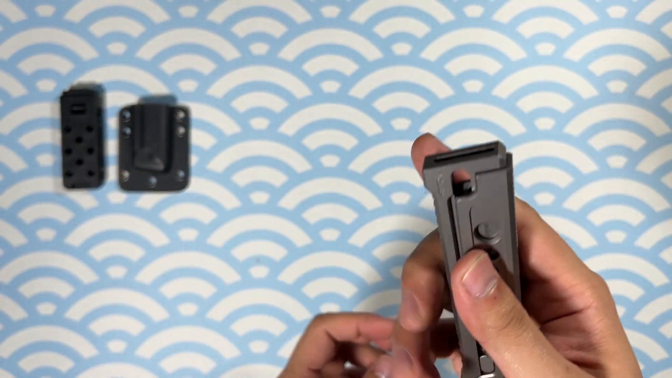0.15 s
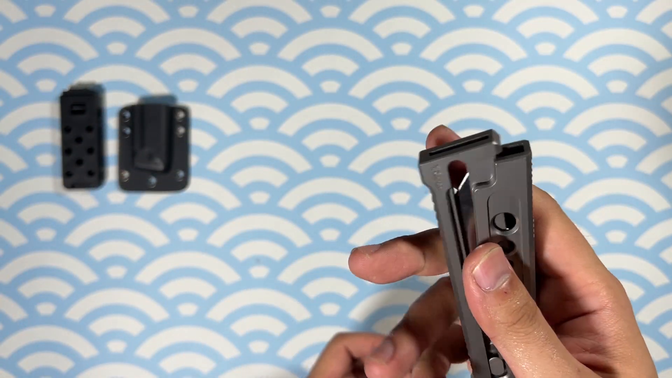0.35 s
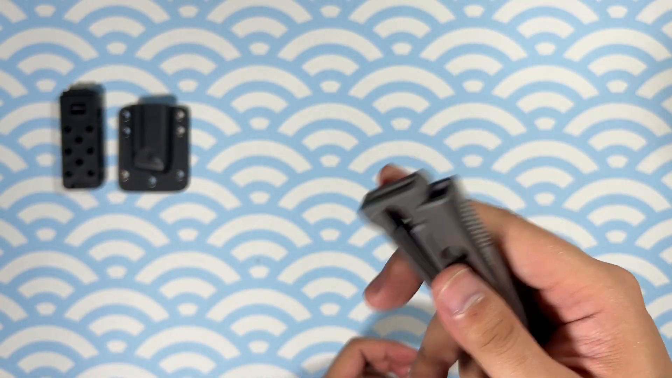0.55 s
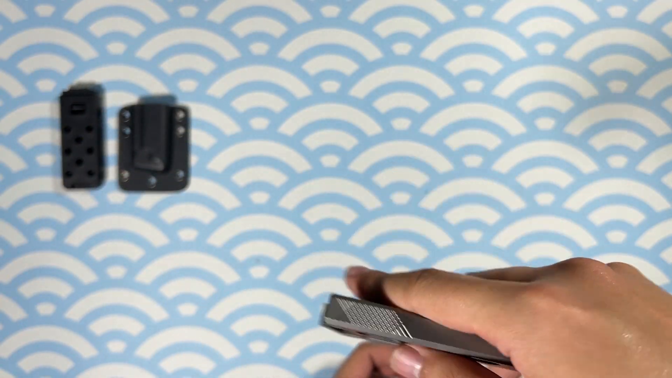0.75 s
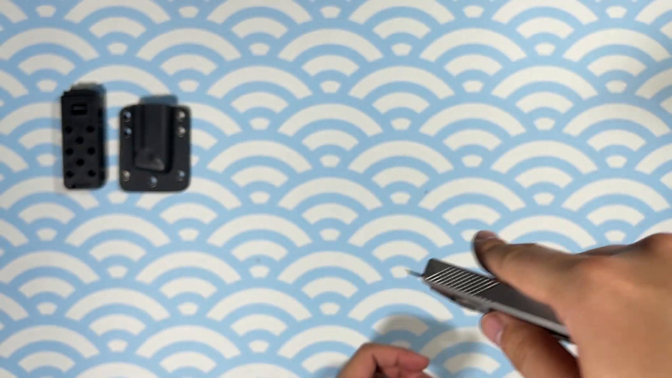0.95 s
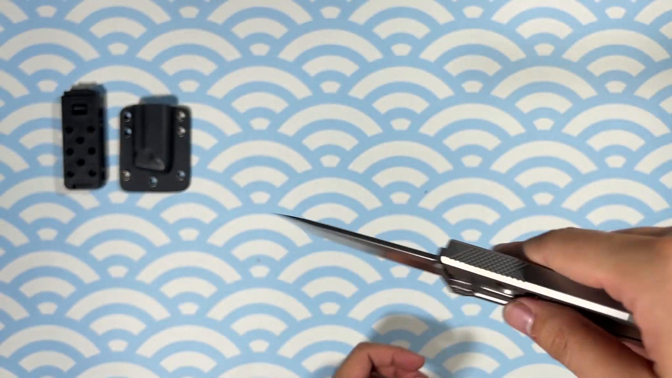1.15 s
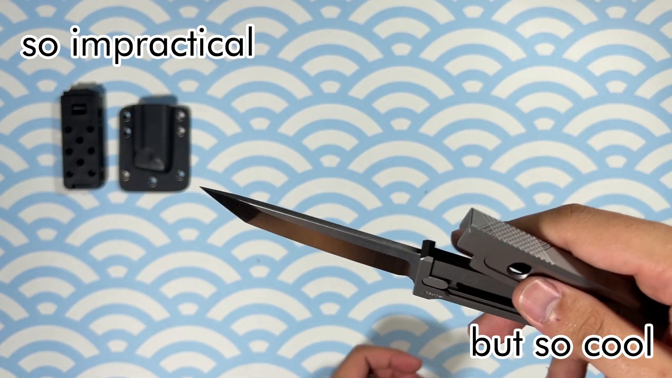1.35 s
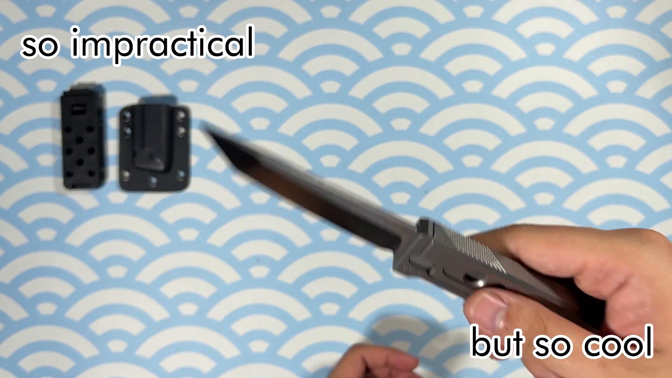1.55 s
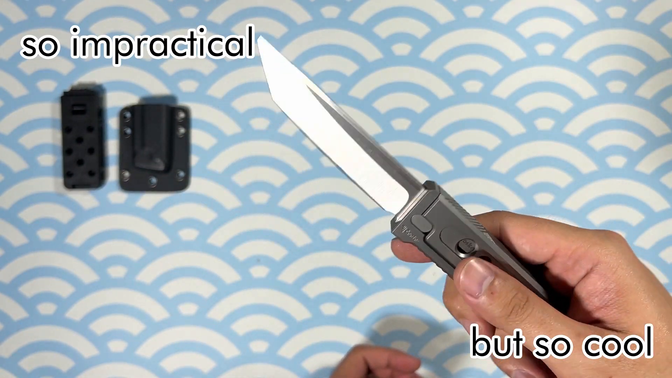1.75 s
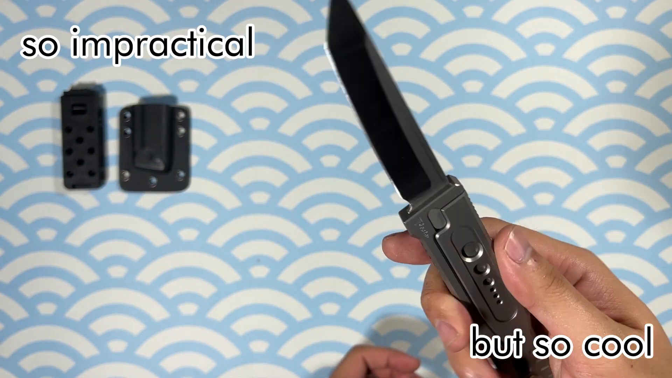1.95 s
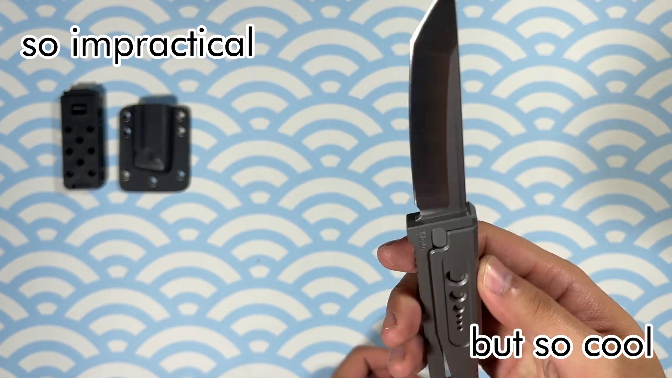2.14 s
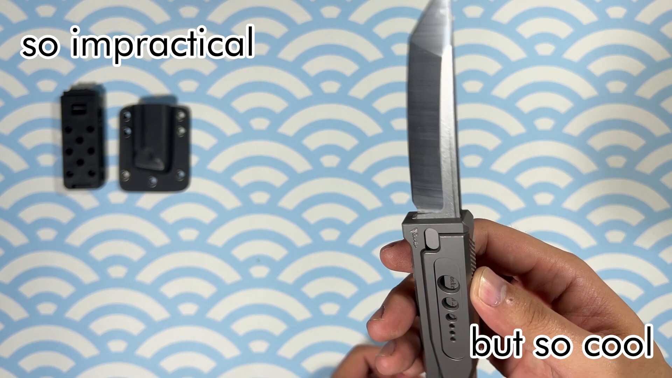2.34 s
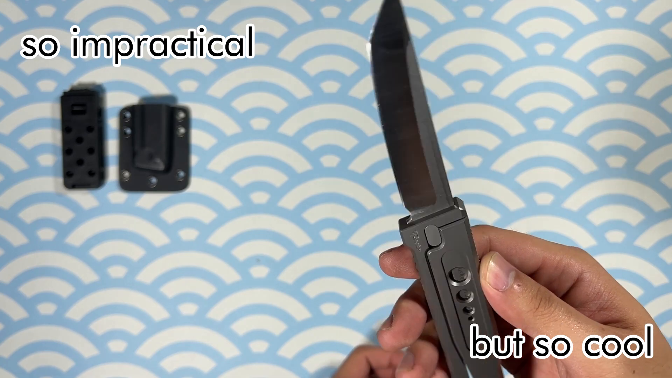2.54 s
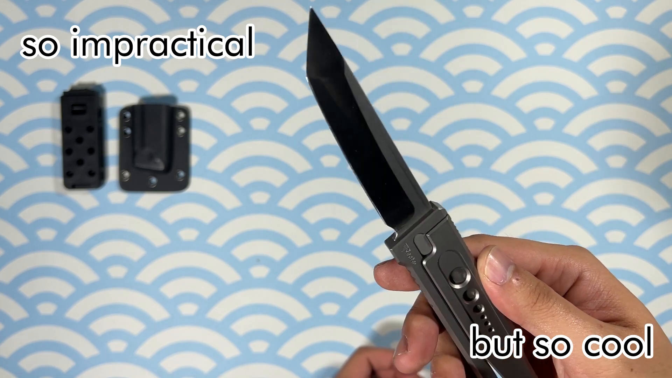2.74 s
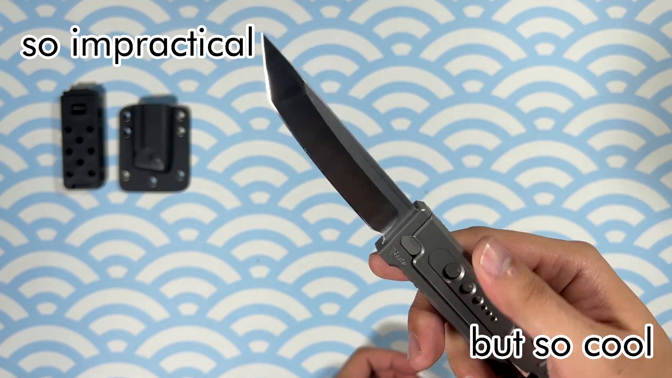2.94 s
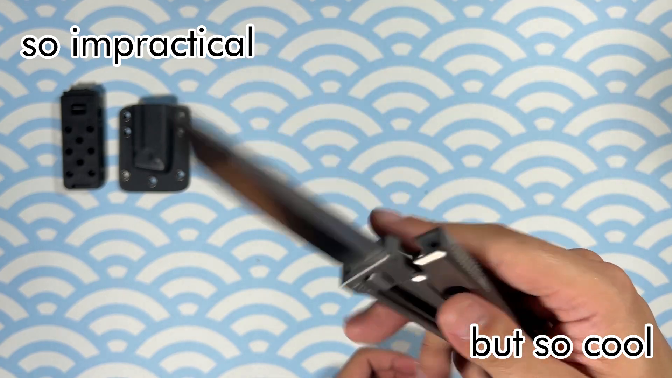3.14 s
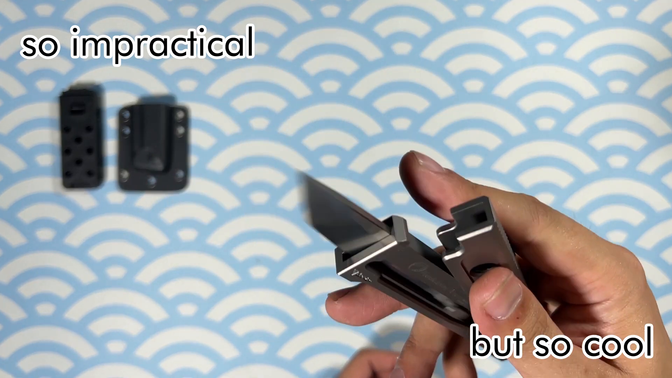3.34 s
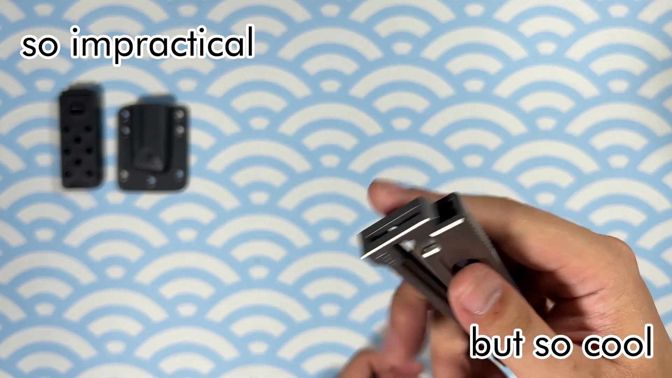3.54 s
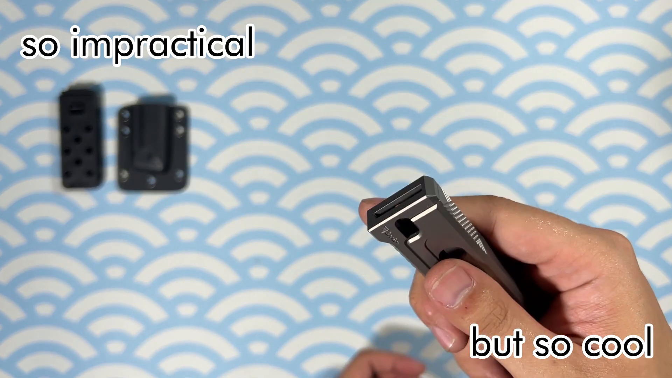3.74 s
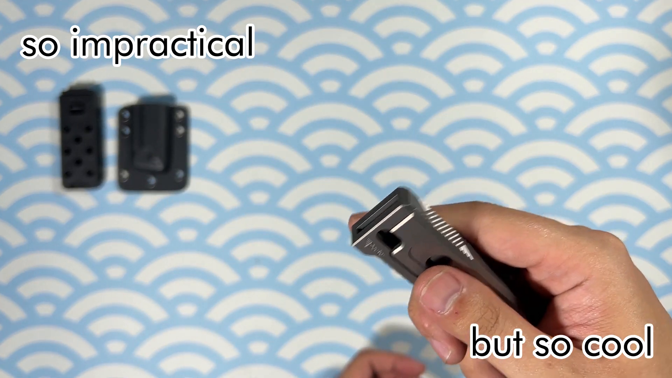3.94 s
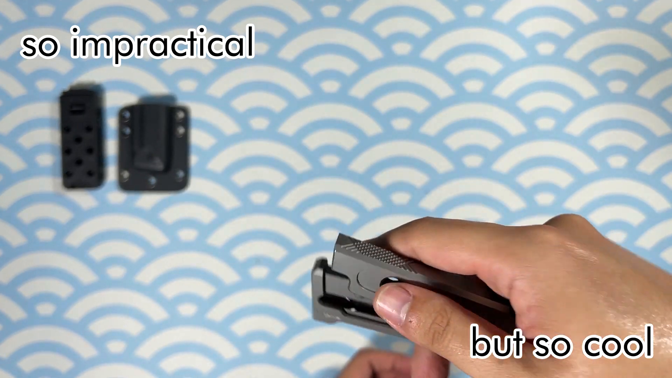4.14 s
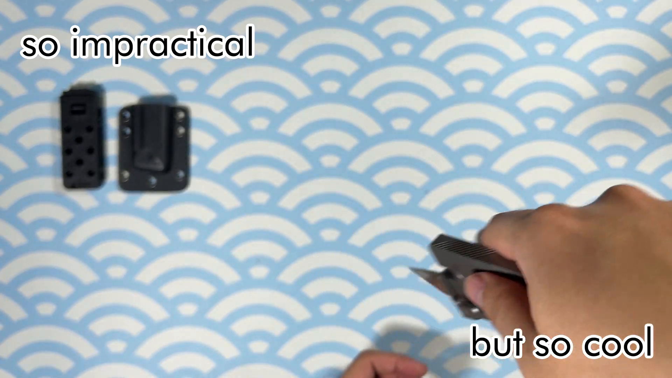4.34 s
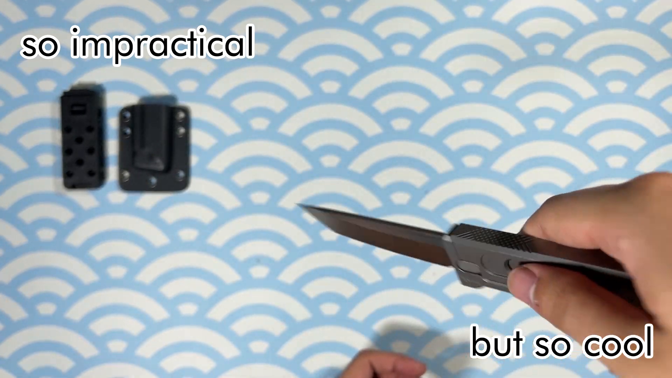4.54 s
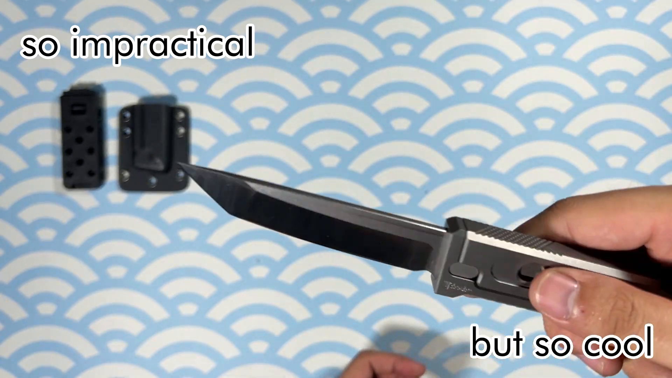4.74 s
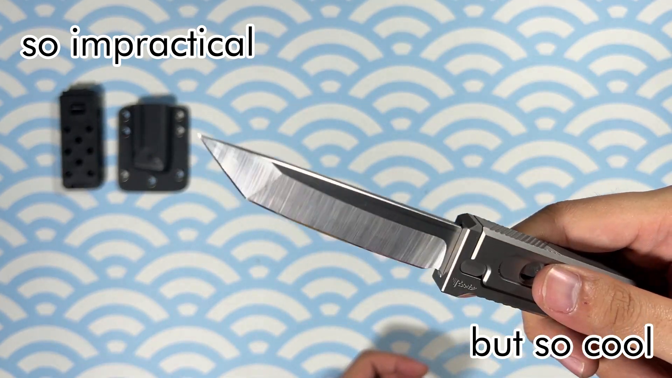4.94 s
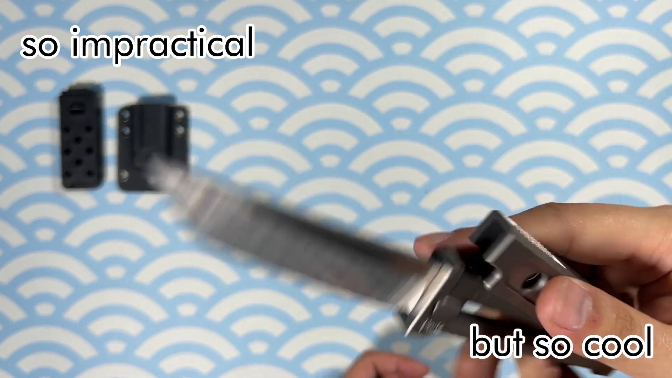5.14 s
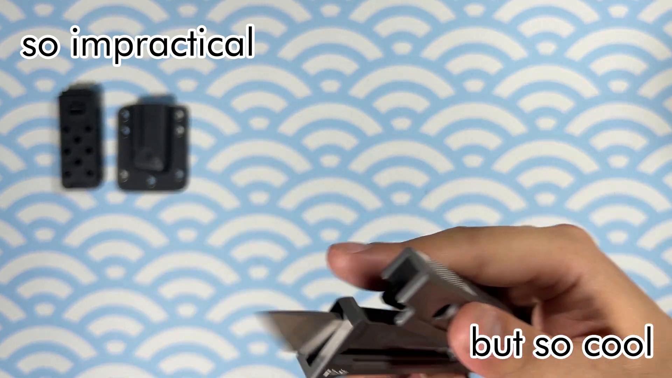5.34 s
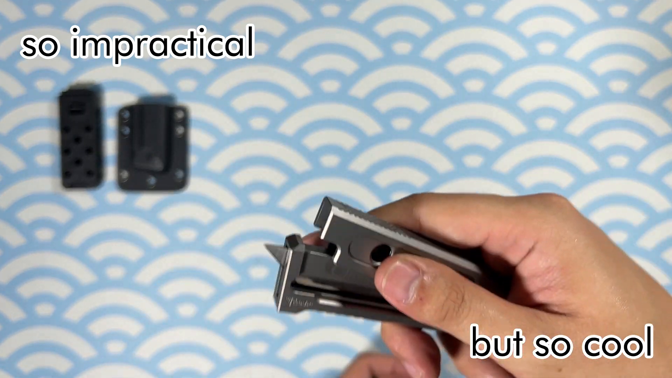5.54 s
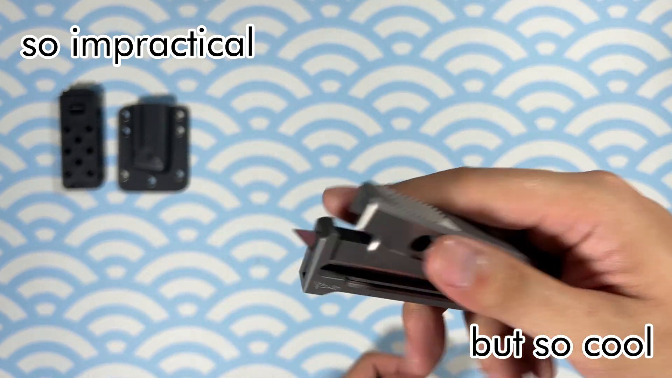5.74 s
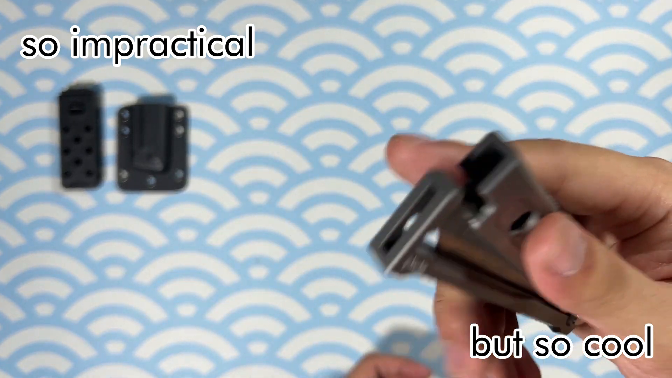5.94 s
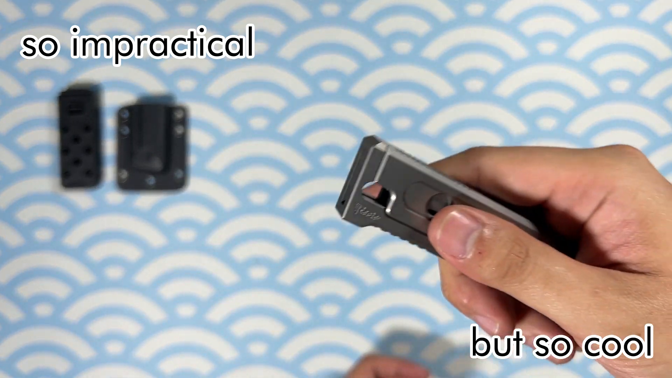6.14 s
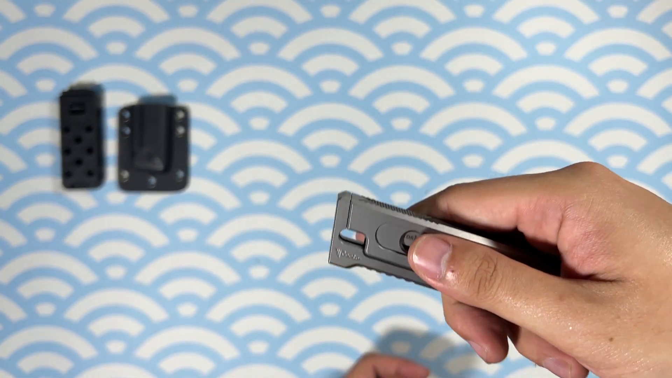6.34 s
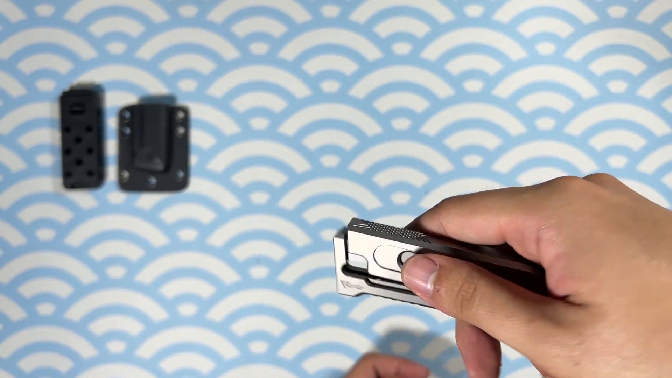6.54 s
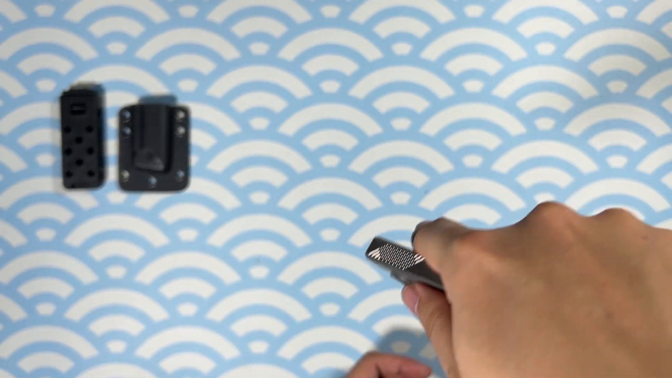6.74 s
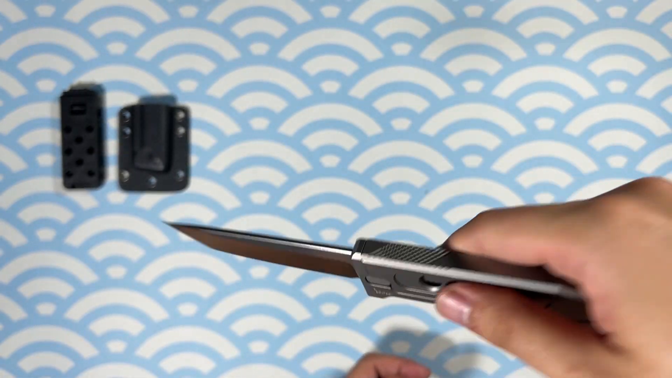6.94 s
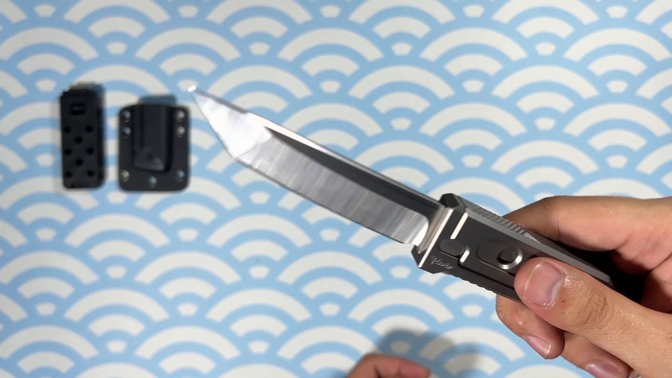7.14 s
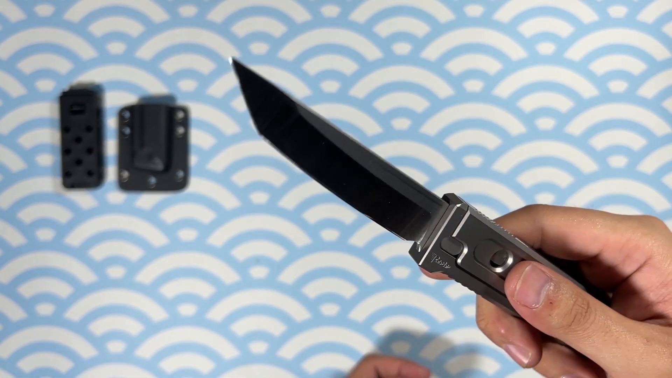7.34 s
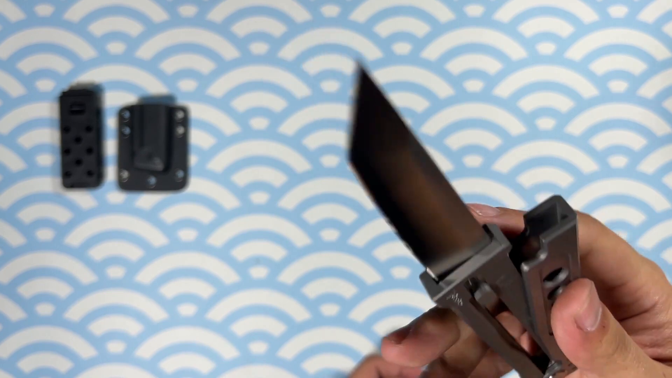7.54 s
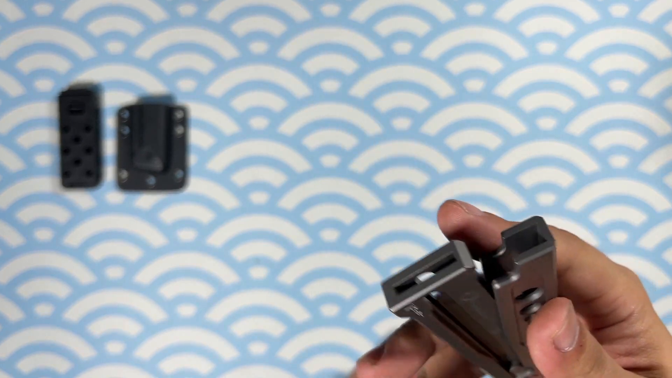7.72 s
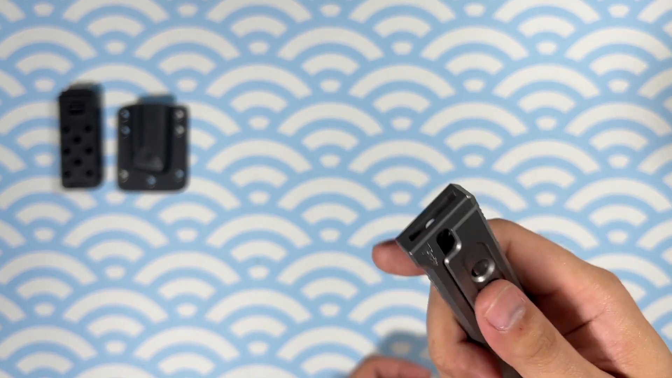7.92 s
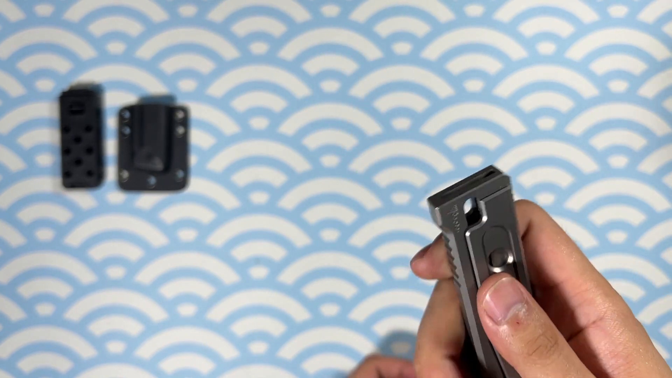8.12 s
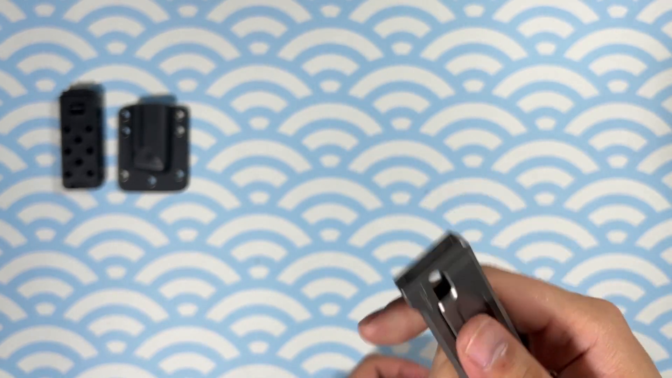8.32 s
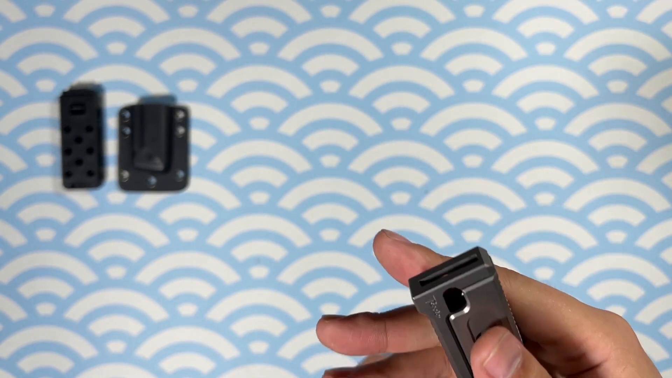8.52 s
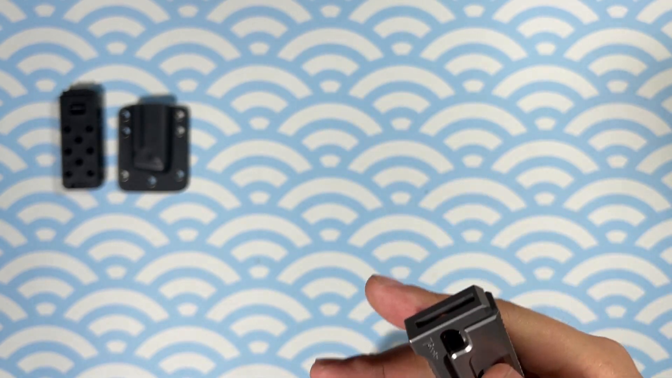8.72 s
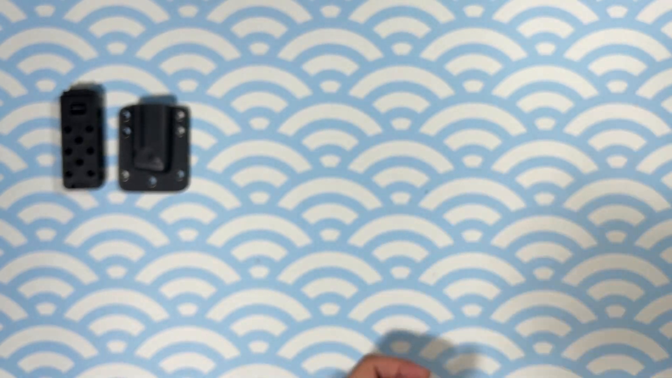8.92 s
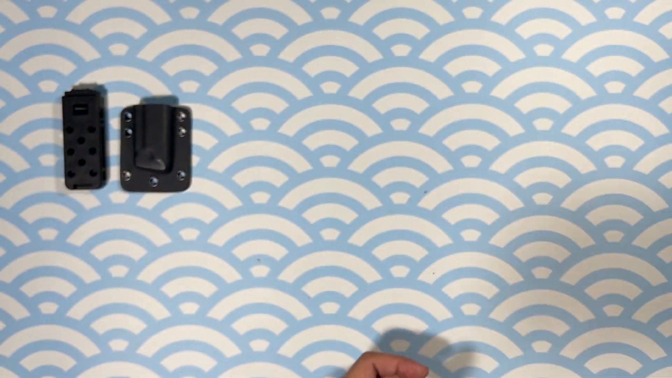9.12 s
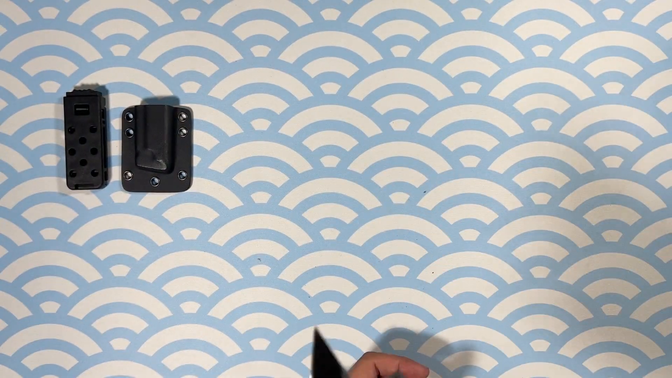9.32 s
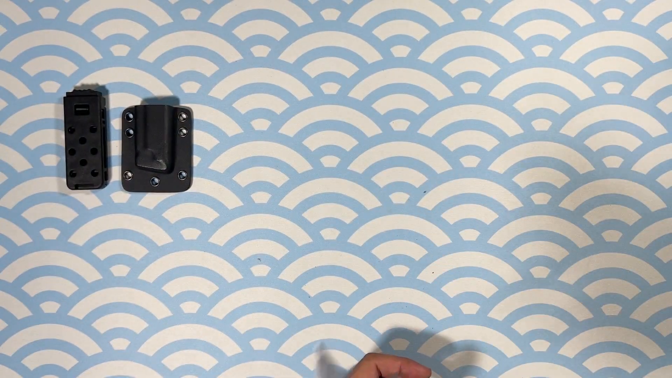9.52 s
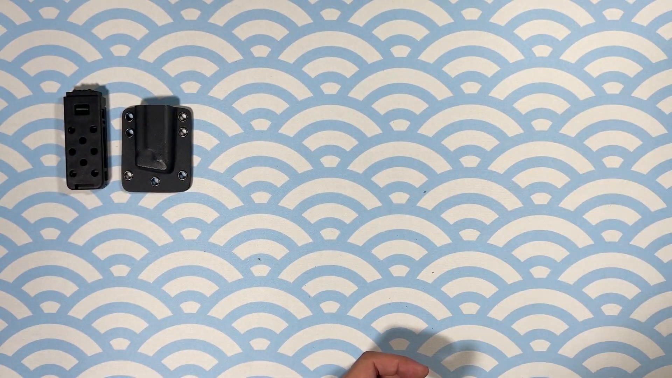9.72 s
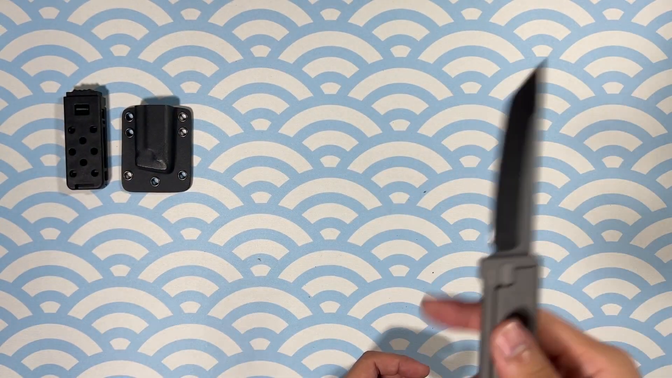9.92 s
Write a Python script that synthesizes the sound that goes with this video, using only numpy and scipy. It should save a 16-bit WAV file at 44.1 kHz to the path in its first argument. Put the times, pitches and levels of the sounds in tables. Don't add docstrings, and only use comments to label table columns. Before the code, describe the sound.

Bright metal clacks and thin ticks burst as a folding knife slides open, drops closed and snaps shut over low hum and soft clock ticking.

```python
import sys
import numpy as np
from scipy import signal
from scipy.fft import rfft, irfft, next_fast_len
from scipy.io import wavfile

SR = 44100
rng = np.random.default_rng(int(sys.argv[2]) if len(sys.argv) > 2 else 0)


def inscribe(sig):
    pcm = np.round(np.clip(np.atleast_2d(sig).T, -1, 1) * 32767)
    wavfile.write(sys.argv[1], SR, pcm.astype(np.int16))


N = 439677
PAD = next_fast_len(N + SR)
HZ = np.maximum(np.arange(PAD // 2 + 1) * SR / PAD, 1)

# f/Hz, width/Hz, level/dB
HUM = [
    (56.4, 2.3, -53),
    (162, 3, -79),
    (113.5, 6.8, -72.5),
    (1770, 71, -98.5),
]
# f/Hz, level/dB per Hz
AIR = [(41, -27.5), (70, -5), (87, -26.5), (171, -25.5), (306, -38), (374, -36.5), (639, -45), (720, -47),
       (1200, -53.5), (1560, -80), (2640, -120)]
AIR_DB = -65.5
# f/Hz, likeness/0-1
AIR_LIKENESS = [(60, 0.55), (240, 0.65), (950, 0.058), (3770, 0.061), (15000, 0.084)]
# f/Hz, level/dB per Hz
HISS = [(710, -33), (1200, -3), (1700, -4), (2700, -18), (5810, -17), (6990, -11), (9000, -24),
        (11700, -54), (19800, -120)]
HISS_DB = -86

# f/Hz, level/dB per Hz
CLOCK_CASE = [(290, -63.5), (500, -28), (853, -11), (957, -14.5), (1540, -15), (1730, -7), (2060, -21),
              (5210, -28), (8000, -44), (10400, -75), (17600, -120)]
CLOCK_START_S, CLOCK_PERIOD_S, CLOCK_DB = -.003, 1.0001, -64

# t/s, peak/dB, low body/dB, top/dB, f/Hz
HITS = [(1.1672, -21.5, -11.5, -19.5, 4960), (1.3656, -10, -17, -1, 7360), (1.7238, -26, -6, -6, 4000),
        (1.7266, -17, -6.5, -4.5, 4300), (3.608, -7, -19, -4, 3200), (3.6208, -17.5, -11, -20.5, 5650),
        (3.7634, -4, -19.5, -5, 4990), (4.6321, -7.5, -23.5, -4.5, 6320), (5.5699, -15.5, -12, 1, 4600),
        (6.0711, -14, -10.5, -1, 3266), (6.1743, -5.5, -24, -5, 7420), (7.0282, -8, -21, -2, 7200),
        (7.031, -14.5, -25, -6, 4500), (4.647, -20.5, -24.5, -6, 5400), (3.7594, -25.5, -18, -3.5, 7500),
        (7.1141, -21.5, 2, -6, 2500), (7.8799, -8.5, -15.5, 0, 6870), (7.8934, -18, -17, -13, 7300),
        (8.0254, -7.5, -28.5, 4, 6680), (9.019, -16, -45.5, -3.5, 6760), (9.3836, -9, -11.5, -2, 4300),
        (9.3884, -11, -15, -8.5, 7470), (9.5841, -30.5, -12, -6, 6950)]
# t/s, peak/dB, top/dB, f/Hz
TICKS = [(0.1626, -57.5, -61, 3870), (0.2787, -35.5, -12, 4300), (0.335, -51, -24, 3940),
         (0.39, -33, -2, 7000), (1.4366, -35.5, -10.5, 7270), (3.3103, -31.5, -6, 5100),
         (3.3707, -34, -7, 3760), (3.4134, -39.5, 9, 8400), (3.4378, -36.5, 6, 6930),
         (4.406, -44.5, -17.5, 3690), (4.4764, -51, -18, 7260), (4.574, -40.5, -26, 7520),
         (4.8606, -52.5, -21, 3730), (5.371, -28.5, 2, 7600), (5.3901, -27, -43, 7000),
         (5.4254, -40, 4, 8650), (5.477, -33, 7, 6960), (6.0297, -34.5, -20.5, 7470),
         (7.7075, -34, -0.5, 8300), (7.7112, -32, 13, 8330), (3.3502, -37, -4.5, 7290),
         (5.3107, -42.5, -5, 7390), (5.99, -43, 2.5, 8020), (1.455, -38.5, -6, 4910),
         (1.476, -38, -8, 4380), (7.7427, -35, 3, 8760), (7.7815, -34, -3.5, 3250), (8.541, -52, -11, 3810),
         (8.6206, -30.5, -8, 4100), (9.2363, -45.5, 5.5, 8250), (9.2556, -36.5, -2, 3690),
         (9.434, -27.5, 1, 5400), (9.553, -34, -4, 4210), (9.7623, -50.5, -19.5, 3760),
         (9.7893, -52, -15, 3700), (9.839, -51.5, -8, 3810)]
TICK_LOW_DB = -19.5
# t/s, peak/dB, low body/dB, f/Hz
KNOCKS = [(0.5732, -41, -7, 3800), (0.7575, -29, -9, 7500), (0.831, -45, -1, 1990),
          (1.6733, -57, 0.5, 3800), (1.6898, -58, 10, 3940), (3.135, -74, 9.5, 2410),
          (3.2816, -51.5, 1.5, 4500), (4.2317, -65.5, 3, 2700), (5.258, -44.5, -4, 4026),
          (5.2798, -60, 12, 2570), (5.2914, -41.5, 1.5, 4820), (7.5803, -50.5, -6, 2580),
          (7.625, -35.5, -5.5, 4430), (8.996, -46, -8, 7340), (9.3632, -40, -10, 3640),
          (9.378, -31.5, 0, 5000), (9.593, -33, -15, 4500), (9.188, -54.5, -10, 3600),
          (9.215, -45, -9, 4000), (4.397, -59.5, 7, 3590), (9.6843, -46.5, -8.5, 3520)]
KNOCK_TOP_DB = -9
# t/s, peak/dB, low body/dB, f/Hz
MUFFLED = [(1.235, -28, -7, 4930), (1.802, -31, -11, 4700), (3.163, -73, 18.5, 2760),
           (4.75, -38.5, 4, 2770), (5.925, -41.5, -5, 3880), (6.1476, -32, -4.5, 3690),
           (6.4944, -78.5, 13, 2530), (6.758, -46, -12, 3446), (8.393, -78.5, 16, 3350),
           (8.4382, -82, 17.5, 3610)]
MUFFLED_TOP_DB = -10.5

# f/Hz, time to fall 60 dB/s
SINGING_MODES = [(3850, .06), (4620, .12), (5160, .12), (6510, .08), (7420, .16), (9480, .11), (3170, .07),
                 (4365, .1), (5405, .12), (11245, .1), (13120, .1)]
FRAME_VOICE_DB = [-12, -4.5, -4.5, -7, -10, -19, -15.5, -14.5, -10.5, -14, -13]
BLADE_VOICE_DB = [-10.5, -7, -8, -14.5, 0.5, -8, -16, -7.5, -3.5, -17.5, -9]
# t/s, frame/dB, blade/dB
SINGING = [(1.368, -53.5, -49.5), (1.724, -55, -65), (3.607, -40.5, -36.5), (3.764, -39, -51.5),
           (4.634, -62, -25.5), (4.75, -60, -51), (5.568, -40, -46), (6.176, -35, -30.5),
           (7.029, -49, -25.5), (7.113, -49.5, -46), (7.882, -62.5, -27.5), (8.024, -33.5, -34),
           (8.623, -62, -74.5), (9.018, -50, -44), (9.381, -59, -63), (9.581, -51.5, -55.5),
           (6.072, -48, -52.5)]
# t/s, f/Hz, level/dB, 60 dB fall/s
RINGS = [(0.39, 2980, -49, 0.027), (1.727, 2520, -32, 0.047), (1.728, 3776, -39.5, 0.072),
         (1.802, 4700, -55, 0.041), (7.03, 4350, -29, .1), (3.609, 5710, -20, 0.19),
         (3.609, 7410, -21, 0.21), (3.609, 3110, -32.5, 0.11), (3.763, 4596, -34.5, 0.14),
         (3.764, 5158, -34.5, 0.096), (3.765, 2465, -38.5, .09), (6.071, 5765, -38, .15),
         (6.072, 3230, -42.5, 0.056), (6.174, 2409, -36, 0.16), (6.175, 2515, -38, 0.13),
         (7.029, 5740, -31, .15), (7.029, 9700, -33, .12), (7.115, 2544, -38, 0.089),
         (7.114, 2460, -33, 0.13), (8.025, 2469, -42, 0.16), (8.621, 3900, -62, .11),
         (8.621, 4060, -61, .1), (9.02, 2540, -35.5, 0.062), (9.582, 7450, -55, .18)]
STRIKE_SPREAD_DB = 2
PAIR_SPLIT, HOLD_DETUNE = .004, .003

# f/Hz, width/Hz, level/dB
RAIL = [(3300, 27, -4.5), (4620, 860, 0), (7370, 790, -1), (9170, 120, 2.5), (12500, 300, -2.5),
        (15420, 320, 4)]
# t/s, level/dB
SLIDES_OUT = [
    [(.98, -85), (1.08, -71), (1.16, -51.5), (1.2, -46.5), (1.29, -47), (1.36, -50.5)],
    [(4.41, -70.5), (4.47, -59), (4.53, -52.5), (4.6, -48), (4.63, -32)],
    [(6.745, -87), (6.77, -64.5), (6.85, -64), (6.92, -54), (7.0, -51), (7.025, -36)],
]
OUT_TOP_DB = -18
FAST_DB, GAP_HZ, GAP_HZ_PER_DB, GAP_TOP_HZ, GAP_DB, GAP_DB_PER_DB = -50, 4270, 44.5, 4500, -10, 0.74
# t/s, scrape/dB, bite of the edge as top/dB
SLIDES_IN = [
    [(3.32, -50.5, -8), (3.35, -46.5, -3), (3.385, -46.5, -9), (3.405, -62, -13), (3.45, -43.5, -4),
     (3.52, -48, 0.5), (3.585, -47, 0), (3.605, -40.5, -8)],
    [(5.27, -100, -28), (5.3, -53, -15), (5.36, -44.5, -5), (5.41, -52, -13), (5.46, -43, -1),
     (5.51, -49.5, -1), (5.565, -44, -3)],
    [(5.93, -60, -15), (5.98, -49.5, -12.5), (6.02, -68.5, -10.5), (6.065, -52, 4.5)],
    [(7.62, -71, -14), (7.64, -51, -12), (7.7, -57.5, -5), (7.76, -41, -5), (7.84, -60.5, 4),
     (7.876, -39.5, -17)],
]
IN_GAP_HZ, IN_GAP_DB, IN_GAP_PER_BITE = 4000, -14, 0.75
# start t/s, peak t/s, end t/s, peak/dB, gap f/Hz
RUBS = [
    (0.497, 0.551, 0.55, -57.5, 3660),
    (1.658, 1.721, 1.72, -49.5, 3250),
    (4.247, 4.286, 4.35, -57, 3386),
    (9.19, 9.247, 9.32, -52, 3503),
    (8.483, 8.515, 8.57, -78.5, 3794),
    (9.845, 9.879, 10.02, -61, 3458),
]
RUB_IN_DB, RUB_OUT_DB, RUB_SHOULDER, RUB_TOP_DB, RUB_GAP_DB = 26.5, 35, 0.38, -20, -1
# t/s, level/dB, length/s
RATTLES = [
    (3.627, -35, 0.13),
    (4.645, -27.5, .155),
    (6.096, -52, 0.064),
    (7.043, -26.5, .07),
    (7.901, -30, .1),
]
RATTLE_HOLD_S, RATTLE_DB_PER_S = 0.018, 251
RATTLE_TOP_DB, RATTLE_HZ, RATTLE_GAP_DB = -12.5, 4700, -5.5
# t/s, level/dB
RUSHES = [(3.76, -50), (6.17, -33), (8.02, -36), (7.879, -35.5), (7.027, -30), (9.381, -43)]
RUSH_S, RUSH_DB = .022, 18
# t/s, hold/s, level/dB
SETTLES = [
    (1.4, .08, -48.5),
    (9.398, 0.039, -46),
]
SETTLE_S, SETTLE_DB, SETTLE_TOP_DB, SETTLE_HZ, SETTLE_GAP_DB = 0.079, 54.5, -16, 4930, -16
RATTLE_LOW_DB, SLIDE_LOW_DB, LOW_SPLIT_HZ = -8.5, -3, 3300

# from t/s, to t/s, from f/Hz, to f/Hz, level/dB
CATCHES = [(1.1, 1.166, 7800, 7900, -64.5), (1.255, 1.3, 5000, 5000, -53.5),
           (1.203, 1.349, 8100, 7700, -64), (1.683, 1.7, 2350, 2760, -57), (1.67, 1.718, 1650, 1750, -64.5),
           (6.882, 7.026, 7500, 8050, -56), (9.241, 9.283, 3900, 3430, -56.5),
           (9.858, 9.89, 3300, 3300, -63), (9.9, 9.927, 3400, 3250, -59), (3.335, 3.36, 4400, 4600, -53.5),
           (3.372, 3.41, 3900, 3700, -54.5), (3.455, 3.49, 12540, 12400, -52),
           (3.525, 3.585, 12300, 12600, -50.5), (3.51, 3.56, 7930, 7800, -54),
           (5.425, 5.496, 12400, 12400, -54), (5.418, 5.49, 11200, 11500, -55),
           (5.33, 5.42, 4000, 3900, -60), (5.365, 5.39, 7540, 7500, -50), (5.424, 5.478, 8330, 9400, -44),
           (5.51, 5.55, 7400, 7900, -49), (5.955, 5.992, 4000, 3800, -58.5), (6.757, 6.8, 3300, 3400, -62),
           (6.83, 6.865, 3820, 3900, -55), (6.89, 6.935, 3900, 4600, -55), (6.965, 7.0, 4400, 4300, -58),
           (7.635, 7.66, 7640, 7400, -69.5), (7.635, 7.66, 4500, 4400, -55),
           (7.745, 7.835, 12600, 12500, -51.5), (7.783, 7.8, 9200, 9100, -45.5)]
CATCH_WIDTH_HZ = 130
# t/s, level/dB
THUMPS = [(3.61, -46.5), (4.638, -28.5), (9.5, -47), (7.035, -38.5), (7.884, -75), (9.388, -42),
          (9.022, -51), (8.8, -51.5)]
# from t/s, to t/s, f/Hz, width/Hz, level/dB
CREAKS = [(3.7, 4.005, 570, 30, -74), (6.7, 6.8, 985, 70, -71), (6.72, 6.9, 560, 200, -73),
          (7.689, 7.788, 604, 60, -74.5), (6.78, 6.91, 950, 200, -75), (4.262, 4.33, 1600, 300, -74),
          (3.61, 3.7, 1000, 200, -70), (8.03, 8.15, 1550, 150, -70)]

# f/Hz, time/s
ROOM_T60 = [(500, 0.11), (2000, 0.28), (5000, 0.28), (10000, 0.26), (16000, 0.1)]
# f/Hz, likeness/0-1
ROOM_LIKENESS = [(500, .1), (1500, .4), (3000, .1), (6000, 0), (8000, .9), (16000, .95)]
# f/Hz, left minus right/dB
ROOM_LEAN = [(2000, 0), (2800, 1), (4000, 4), (5500, 8), (7000, 4), (9000, 0)]
# f/Hz, level/dB
DIRECT_DIP = [(3000, 1), (4300, -0.5), (5500, -9), (6600, -2), (8000, 2)]
# f/Hz, phase/radians
PORT_PHASE = [(0, 0), (2150, 0), (3010, 1.1), (5080, 1.1), (6460, -.3), (7920, -.9), (9730, -2.55),
              (10800, -3.45), (12800, -6.0), (14500, -6.7), (16700, -9.7)]
# f/Hz, left minus right/dB
PORT_BALANCE = [(60, 2.0), (150, 0.0), (380, 0.0), (950, -2), (2380, -0.5), (5980, 1.0), (15000, 0.0)]
# f/Hz, level/dB
PORT_COLOUR = [(300, 6.5), (1000, -3), (2000, -1), (2700, 2.5), (5000, 5.5), (7500, 0), (9500, 0.5),
               (11000, 11.5), (13000, -1.5), (15700, -1), (16300, -9)]


def from_db(db):
    return 10 ** (np.asarray(db) / 20)


def rms_one(x):
    return x / np.sqrt(np.mean(x ** 2) + 1e-20)


def at_hz(points, hz):
    curve_hz, value = np.transpose(points)
    return np.interp(np.log(hz), np.log(curve_hz + 1), value)


def band(x, low_hz, high_hz, order=2):
    sos = signal.butter(order, [low_hz, min(high_hz, 20000)], "band", fs=SR, output="sos")
    return signal.sosfilt(sos, x + 1e-18)


def resonance(x, hz, width_hz):
    r = np.exp(-np.pi * width_hz / SR)
    feedback = [1, -2 * r * np.cos(2 * np.pi * hz / SR), r * r]
    return signal.lfilter(np.array([1, 0, -1]) * (1 - r * r) / 2, feedback, x)


def coloured(spectrum):
    white = rfft(rng.standard_normal(PAD))
    return rms_one(irfft(white * from_db(at_hz(spectrum, HZ)), PAD)[:N])


def background():
    hum = sum(from_db(db) * rms_one(resonance(rng.standard_normal(N + SR), hz, width)[SR:])
              for hz, width, db in HUM[2:])
    (hz, width, db), (third_hz, _, third_db) = HUM[:2]
    wander = rms_one(band(rng.standard_normal(N + SR), 0.42, 12, order=1)[SR:])
    sway = rms_one(band(rng.standard_normal(N + SR), 4.2, 8.2, order=1)[SR:])
    turns = 2 * np.pi * np.cumsum(hz + .5 * width * wander) / SR
    hum += np.sqrt(2) * from_db(db + 1.3 * sway) * np.sin(turns)
    hum += np.sqrt(2) * from_db(third_db + 5.9 * wander) * np.sin(turns * third_hz / hz)
    hiss = from_db(HISS_DB + 3) * np.array([coloured(HISS), coloured(HISS)])
    alike = np.clip(at_hz(AIR_LIKENESS, HZ), 0, 1)
    low_cut = HZ ** 2 / (HZ ** 2 + 45 ** 2)
    mid, side = rfft(rng.standard_normal((2, PAD))) * from_db(at_hz(AIR, HZ)) * low_cut
    air = irfft(np.sqrt(1 + alike) * mid + np.sqrt(1 - alike) * side * [[1], [-1]], PAD)[:, :N]
    hum_at_ports = band(hum, 42, 5800) * from_db([[.8], [-.8]])
    return hum_at_ports + from_db(AIR_DB) * rms_one(air) + hiss


def clock():
    t, shape = np.arange(N) / SR, np.zeros(N)
    for s in CLOCK_START_S + CLOCK_PERIOD_S * np.arange(10):
        age = np.clip(t - s, 0, 1)
        shape += from_db(CLOCK_DB) * (1 - np.exp(-age / 0.0034)) * np.exp(-(age / 0.091) ** 2.0)
    return shape * np.array([coloured(CLOCK_CASE), coloured(CLOCK_CASE)])


def contacts():
    ticks = [(s, db, TICK_LOW_DB, top_db, hz) for s, db, top_db, hz in TICKS]
    knocks = [(s, db, low_db, KNOCK_TOP_DB, hz) for s, db, low_db, hz in KNOCKS]
    muffled = [(s, db, low_db, MUFFLED_TOP_DB, hz) for s, db, low_db, hz in MUFFLED]
    return sorted(HITS + ticks + knocks + muffled)


def clacks():
    crack = np.zeros(N)
    t = np.arange(1600) / SR
    fall = np.exp(-(t / 0.0037) ** 1.8)
    fall += from_db(3.5) * np.exp(-t / 0.0007) + from_db(-23.5) * np.exp(-t / 0.0055)
    envelope = (1 - np.exp(-t / 0.00036)) * fall
    for s, db, low_db, top_db, hz in contacts():
        grit = rng.standard_normal(1600) * from_db(2.7 * rng.standard_normal(1600))
        chatter = grit * envelope
        body = band(chatter, 2700, 9500, order=3) + from_db(6.5) * resonance(chatter, hz, 0.095 * hz)
        knock = band(chatter, 1300, 3500) + from_db(16.0) * resonance(chatter, 2540, 300)
        tick = band(chatter, 7000, 15000)
        start = round(s * SR) - 20
        for part, part_db in [(body, 0), (knock, low_db), (tick, top_db)]:
            crack[start:start + 1600] += part / np.abs(part).max() * from_db(db + part_db)
    return crack


def pair(hz, t60, split):
    t = np.arange(SR // 4) / SR
    partials = .7 * np.sin(2 * np.pi * hz * t) + .3 * np.sin(2 * np.pi * hz * (1 + split) * t)
    return partials * from_db(-60 * t / t60)


def loose(tone, flutter_db):
    flutter = rms_one(band(rng.standard_normal(N // 20 + 1), 230, 3800, order=1))
    return tone * from_db(flutter_db * np.repeat(flutter, 20)[:N])


def singing():
    s, frame_db, blade_db = np.transpose(SINGING)
    starts = np.round(s * SR).astype(int) + 40
    out, alone = np.zeros(N), np.zeros(N)
    for (hz, t60), of_frame_db, of_blade_db in zip(SINGING_MODES, FRAME_VOICE_DB, BLADE_VOICE_DB):
        mode = np.zeros(N)
        luck = rng.standard_normal((len(s), 3))
        blow = from_db(frame_db + of_frame_db) + from_db(blade_db + of_blade_db)
        blow = blow * from_db(STRIKE_SPREAD_DB * luck[:, 0])
        for start, size, (_, shift, split) in zip(starts, blow, luck):
            held_hz = hz * (1 + HOLD_DETUNE * shift)
            mode[start:start + SR // 4] += size * pair(held_hz, t60, PAIR_SPLIT * (1.5 + split))
        out += loose(mode, 4.0)
    for when, hz, db, t60 in RINGS:
        start = round(when * SR)
        room_left = alone[start:start + SR // 4]
        room_left += (from_db(db) * pair(hz, t60, 2 * PAIR_SPLIT))[:len(room_left)]
    return band(out + loose(alone, 2.0), 1000, 20000)


def strokes():
    out = []
    for slide in SLIDES_OUT:
        out.append([(s, db, OUT_TOP_DB, min(GAP_HZ + GAP_HZ_PER_DB * (db - FAST_DB), GAP_TOP_HZ),
                     GAP_DB + GAP_DB_PER_DB * np.clip(FAST_DB - db, 0, 14)) for s, db in slide])
    for slide in SLIDES_IN:
        out.append([(s, db, bite_db, IN_GAP_HZ, IN_GAP_DB - IN_GAP_PER_BITE * bite_db)
                    for s, db, bite_db in slide])
    for a, top, b, db, hz in RUBS:
        corners = [(a, RUB_IN_DB), ((a + top) / 2, RUB_SHOULDER * RUB_IN_DB), (top, 0),
                   ((top + b) / 2, RUB_SHOULDER * RUB_OUT_DB), (b, RUB_OUT_DB)]
        out.append([(s, db - drop_db, RUB_TOP_DB, hz, RUB_GAP_DB) for s, drop_db in corners])
    shake = (RATTLE_TOP_DB, RATTLE_HZ, RATTLE_GAP_DB)
    for s, db, length in RATTLES:
        end_db = db - RATTLE_DB_PER_S * (length - RATTLE_HOLD_S)
        out.append([(s, db, *shake), (s + RATTLE_HOLD_S, db, *shake), (s + length, end_db, *shake)])
    rush = (OUT_TOP_DB, GAP_HZ, GAP_DB)
    for s, db in RUSHES:
        out.append([(s - RUSH_S, db - RUSH_DB, *rush), (s, db, *rush)])
    rest = (SETTLE_TOP_DB, SETTLE_HZ, SETTLE_GAP_DB)
    for s, hold, db in SETTLES:
        out.append([(s, db, *rest), (s + hold, db, *rest), (s + hold + SETTLE_S, db - SETTLE_DB, *rest)])
    return out


def patchy(x, patch_db):
    edges = 1200 * 2 ** np.arange(0, 4.1, 1 / 3)
    slow = rms_one(band(rng.standard_normal((len(edges), N // 100 + 2)), 600, 3200, order=1))
    steps = np.arange(N) / 100
    return sum(band(x, low, high) * from_db(patch_db * np.interp(steps, np.arange(len(s)), s))
               for low, high, s in zip(edges, edges[1:], slow))


def scrape():
    level, bright, hollow, gap_hz = np.zeros(N), np.zeros(N), np.zeros(N), np.full(N, 4000.)
    for stroke in strokes():
        s, db, top_db, hz, gap_db = np.transpose(stroke)
        at = np.arange(round(s[0] * SR), min(round(s[-1] * SR), N))
        level[at] = from_db(np.interp(at / SR, s, db) - 4.5)
        bright[at] = level[at] * from_db(np.interp(at / SR, s, np.clip(top_db, -30, 8)))
        hollow[at] = from_db(np.interp(at / SR, s, gap_db))
        gap_hz[at] = np.interp(at / SR, s, hz)
    grains = (rng.random(N) < 9000 / SR) * rng.choice([-1, 1], N)
    grains = grains * from_db(1.0 * np.minimum(rng.exponential(1, N), 5))
    sung = sum((-1) ** k * from_db(db) * loose(resonance(grains, hz, width), 2.0)
               for k, (hz, width, db) in enumerate(RAIL))
    steel = patchy(rms_one(grains) + from_db(3.5) * rms_one(sung), patch_db=3.5)
    gap = band(rng.standard_normal(N), 13, 760) * np.sin(2 * np.pi * np.cumsum(gap_hz) / SR)
    low = np.full(N, from_db(SLIDE_LOW_DB))
    for s, db, length in RATTLES:
        low[round(s * SR):round((s + length) * SR)] = from_db(RATTLE_LOW_DB)
    body = rms_one(band(steel, LOW_SPLIT_HZ, 10000) + low * band(steel, 1500, LOW_SPLIT_HZ))
    body = body + hollow * rms_one(gap)
    top = rms_one(band(steel, 7200, 14000, order=3))
    return loose(level * body + bright * top, flutter_db=1.3)


def catches():
    out, rough = np.zeros(N), rms_one(band(rng.standard_normal(N), 15, CATCH_WIDTH_HZ))
    for a, b, from_hz, to_hz, db in CATCHES:
        at = np.arange(round(a * SR), round(b * SR))
        way = np.linspace(0, 1, len(at))
        turns = 2 * np.pi * np.cumsum(from_hz + (to_hz - from_hz) * way) / SR
        out[at] += from_db(db) * np.sin(np.pi * way) ** .5 * rough[at] * np.sin(turns)
    return out


def ring(clicks, hz, t60):
    r, w = from_db(-60 / (t60 * SR)), 2 * np.pi * hz / SR
    return signal.lfilter([0, np.sin(w)], [1, -2 * r * np.cos(w), r * r], clicks + 1e-18)


def thumps():
    push = np.zeros(N)
    for s, db in THUMPS:
        push[round(s * SR)] = from_db(db)
    return band(ring(push, 91, 0.041) + .5 * ring(push, 240, 0.015), 32, 460, order=1)


def creaks():
    t, out = np.arange(N) / SR, np.zeros(N)
    for a, b, hz, width, db in CREAKS:
        swell = np.sin(np.pi * np.clip((t - a) / (b - a), 0, 1)) ** .5
        out += from_db(db) * swell * rms_one(resonance(rng.standard_normal(N), hz, width))
    return out


def room_tails():
    t, edges = np.arange(SR // 2) / SR, 250 * 2 ** np.arange(0, 6.6, .5)
    tails, late = 0, 0
    white = rng.standard_normal((2, 3, len(t)))
    walls = np.clip((t - .004) / 0.0067, 0, 1)
    table = from_db(18.0) * (t > .0005) * np.exp(-t / 0.0031)
    for k, (low, high) in enumerate(zip(edges, edges[1:])):
        hz = np.sqrt(low * high)
        dying = band(white[k % 2], low, high) * from_db(-60 * t / at_hz(ROOM_T60, hz))
        lean = from_db(at_hz(ROOM_LEAN, hz) * np.array([[0], [.5], [-.5]]))
        tails = tails + dying * (table + walls * lean)
        late = late + dying[0] * walls
    return rfft(tails / np.sqrt(np.sum(late ** 2)), PAD)


def at_ports(knife, wet_db):
    shared, left, right = room_tails() * from_db(wet_db)
    alike = np.clip(at_hz(ROOM_LIKENESS, HZ), 0, 1)
    turn = np.exp(.5j * np.interp(HZ, *np.transpose(PORT_PHASE))) * from_db(.5 * at_hz(PORT_BALANCE, HZ))
    common = from_db(at_hz(DIRECT_DIP, HZ)) + np.sqrt(alike) * shared
    left_path = (common + np.sqrt(1 - alike) * left) * turn
    right_path = (common + np.sqrt(1 - alike) * right) / turn
    paths = np.array([left_path, right_path]) * from_db(at_hz(PORT_COLOUR, HZ))
    return irfft(rfft(knife, PAD) * paths, PAD)[:, :N]


def scene():
    knife = clacks() + singing() + scrape() + catches()
    return at_ports(knife, wet_db=-11) + thumps() + creaks() + clock() + background()


def band_limit(x):
    return signal.sosfilt(signal.butter(12, 17140, fs=SR, output="sos"), x)


def record(dry):
    low_pass = signal.cheby2(16, 70, 17350, fs=SR, output="sos")
    mix = signal.sosfilt(low_pass, np.tanh(dry))
    return band_limit(mix)


dry = scene()
out = record(dry)
inscribe(out)
```